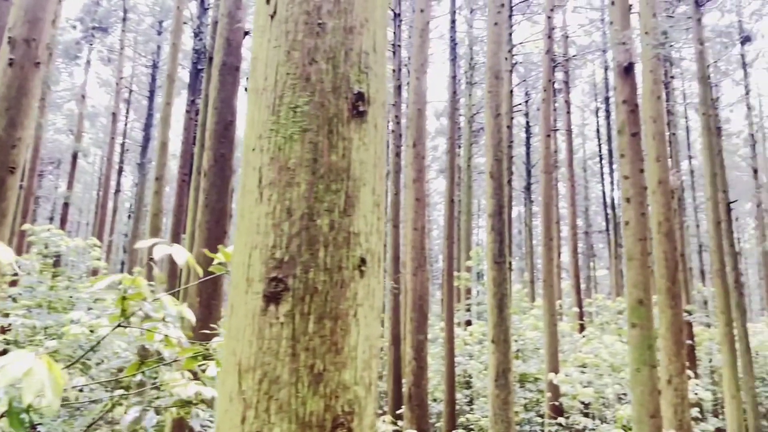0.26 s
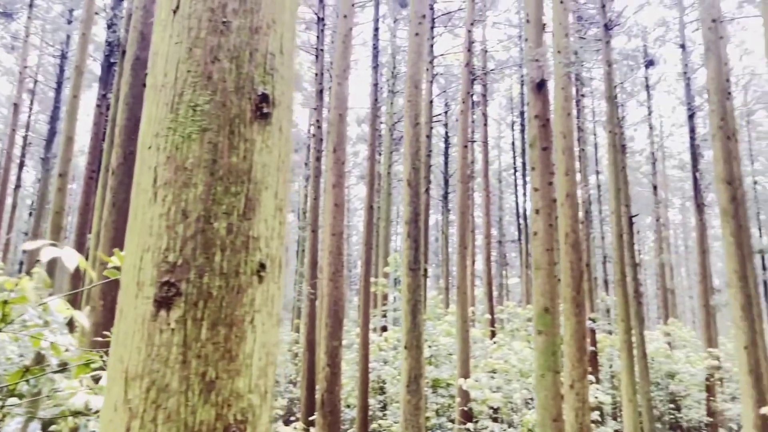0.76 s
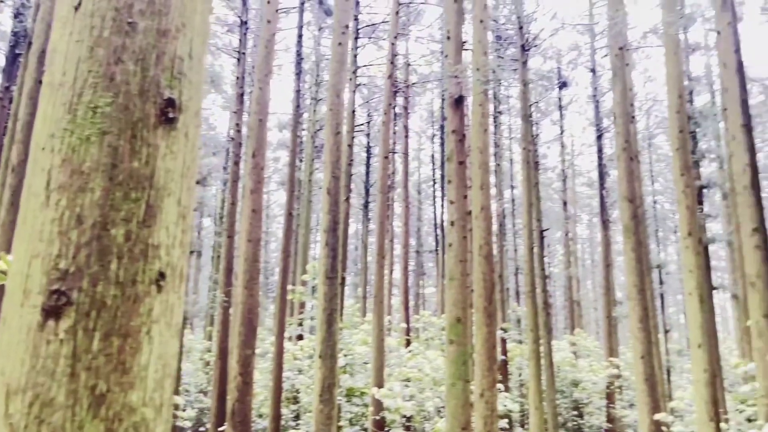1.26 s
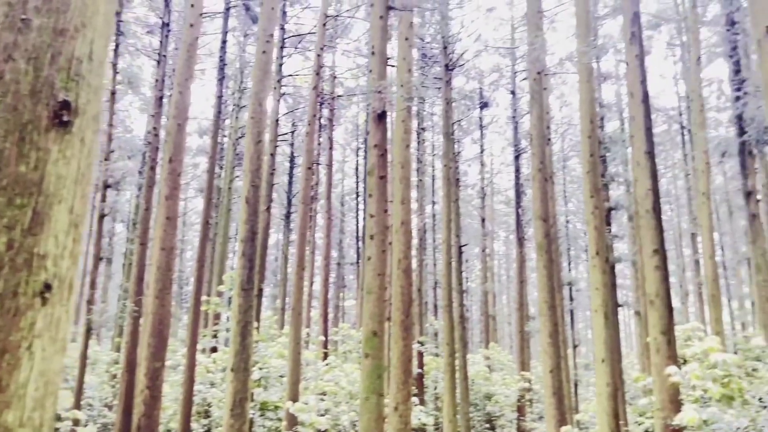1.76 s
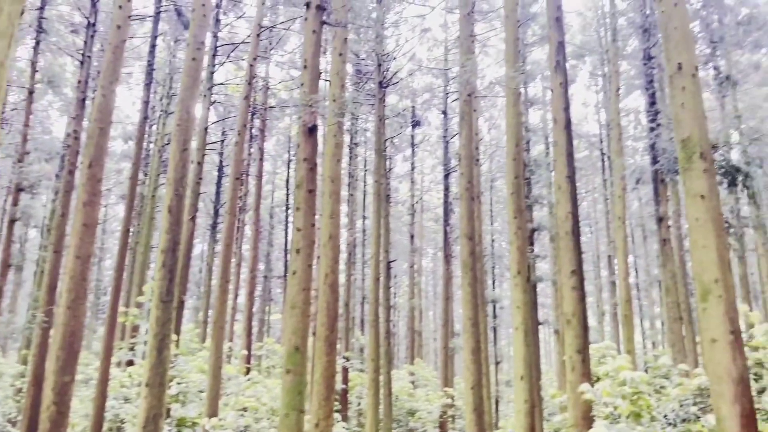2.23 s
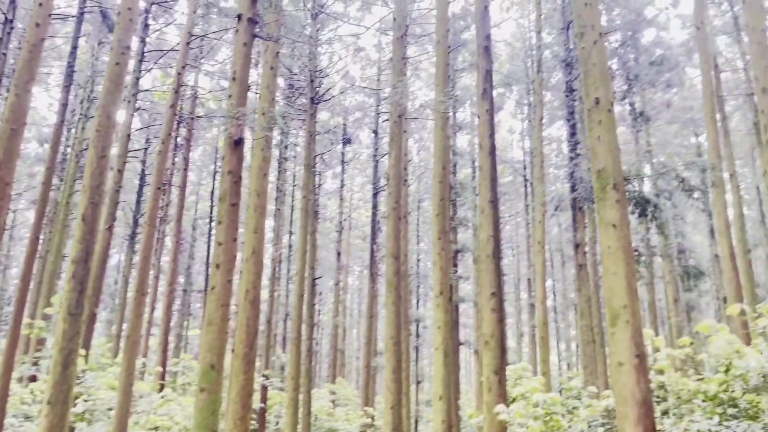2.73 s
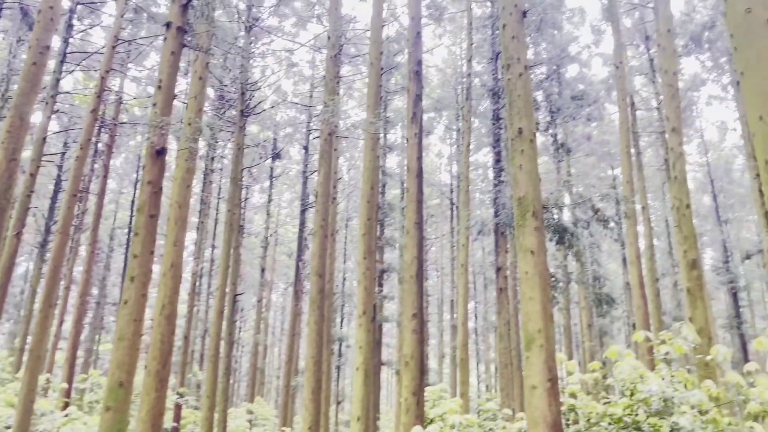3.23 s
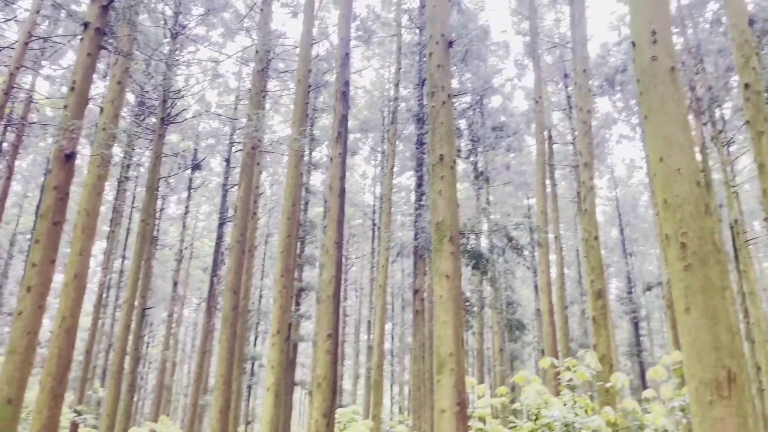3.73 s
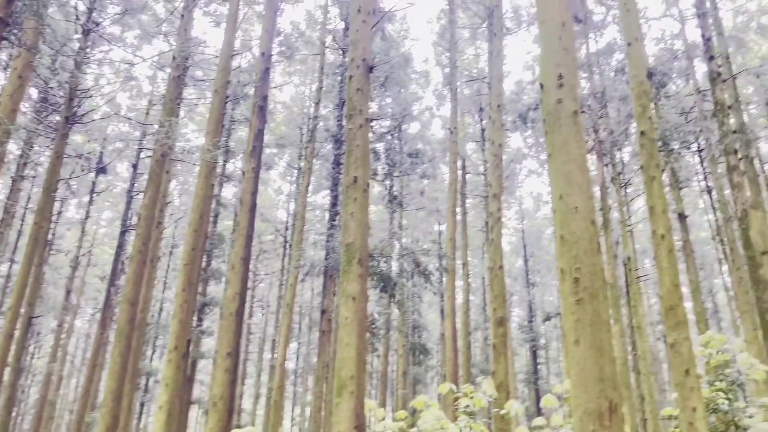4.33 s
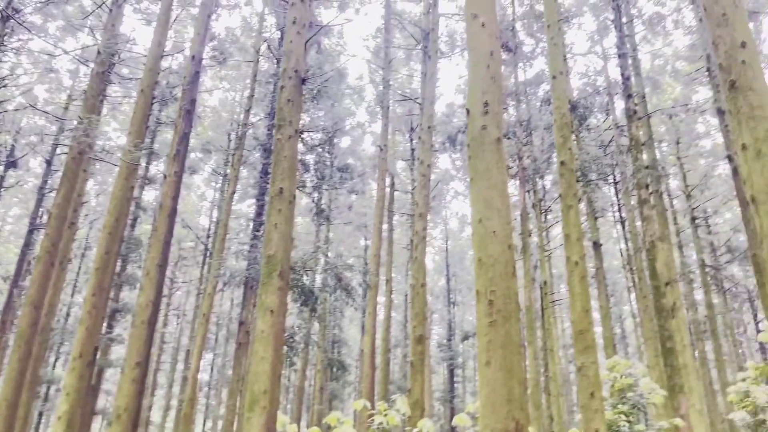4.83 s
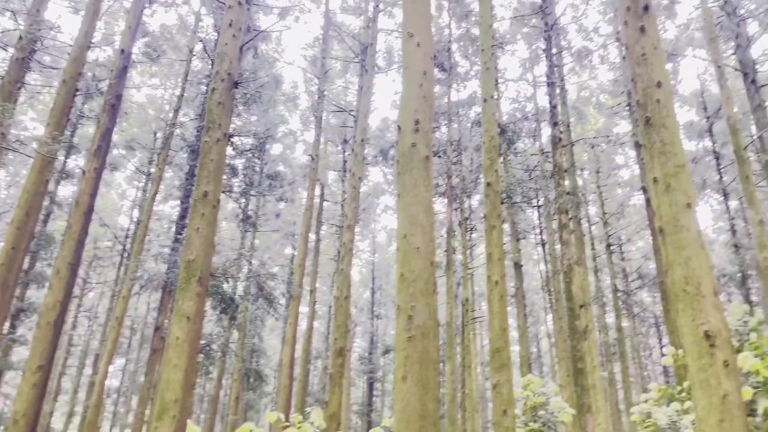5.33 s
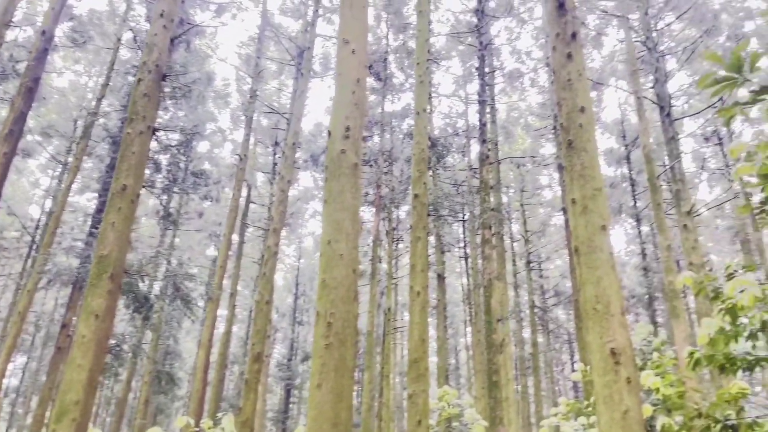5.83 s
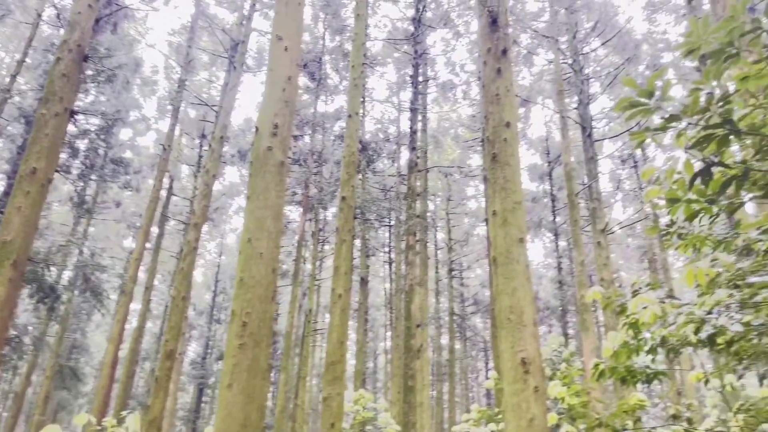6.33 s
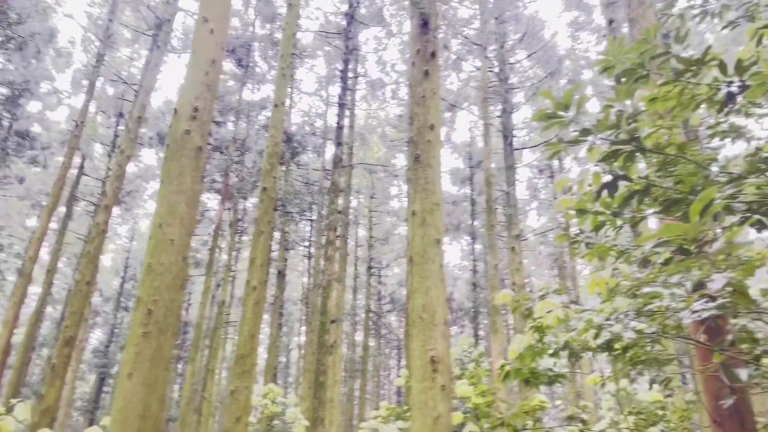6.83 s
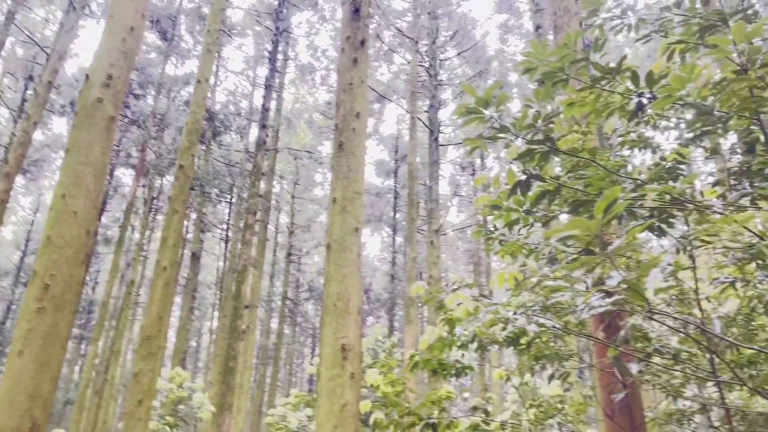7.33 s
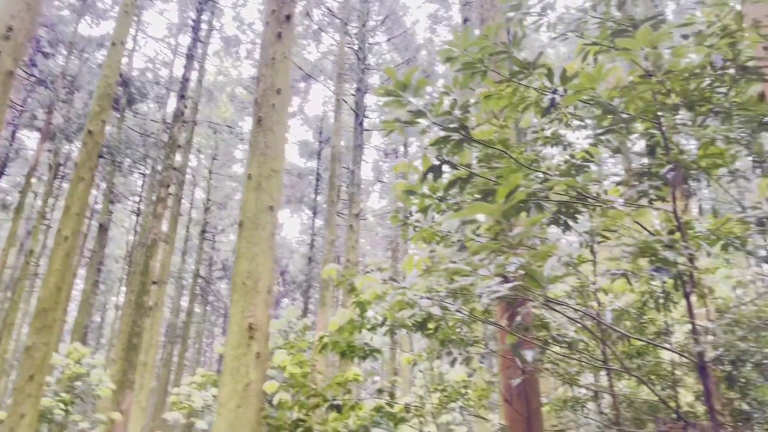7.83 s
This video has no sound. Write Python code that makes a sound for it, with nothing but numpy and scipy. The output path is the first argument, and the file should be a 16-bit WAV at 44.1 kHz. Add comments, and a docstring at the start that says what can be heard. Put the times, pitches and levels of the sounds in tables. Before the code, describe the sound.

Steady rain hisses through a forest while close drops tap on leaves and thump on a thin sheet.

```python
"""Steady rain in a conifer forest.

Distant rain hisses, a far bird peeps once. Small drops patter on leaves; near drops tap and splash.
The heaviest shake a thin sheet with a thump that falls in pitch. Heard by a one-microphone phone
beside the sheet; low background noise rises and dips as its wind filter opens and closes."""
import sys
import numpy as np
from scipy import signal
from scipy.fft import rfft, irfft
from scipy.io import wavfile
from scipy.ndimage import uniform_filter1d

SR = 44100
rng = np.random.default_rng(int(sys.argv[2]) if len(sys.argv) > 2 else 0)


def log_audio(samples):
    """Write samples as a 16-bit WAV file to the path given in sys.argv[1]."""
    # one column per channel
    frames = np.atleast_2d(samples).T
    # limit to full scale, then quantise
    limited = np.clip(frames, -1, 1)
    pcm = np.round(limited * 32767).astype(np.int16)
    wavfile.write(sys.argv[1], SR, pcm)


N = 356328

# Far rain spectrum: freq_hz, density_db
HISS_SPECTRUM = [(200, -44), (500, -18.5), (1000, -13.5), (1570, -4), (1940, -12), (2670, -8), (4180, -7.5),
                 (5400, -11.5), (6550, -17.5), (10800, -17.5), (12000, -20.5), (13700, -21), (15700, -21),
                 (16100, -40)]
# Deep rumble spectrum: freq_hz, density_db
RUMBLE_SPECTRUM = [(20, -38), (45, 1), (90, -1.5), (160, -5.5), (400, -25), (3000, -65)]
# Low noise floor spectrum: freq_hz, density_db
FLOOR_SPECTRUM = [(60, -26.5), (160, -1), (300, 0.5), (600, -0.5), (1000, 0), (2000, -19.5), (6000, -81)]
# Low noise let through by the phone's wind filter: time_s, rumble_db, floor_db
WIND_FILTER_LEVELS = [(0.0, -62.5, -52.5), (0.58, -61, -60), (1.22, -67.5, -51.5), (1.51, -68, -58),
                      (1.75, -60.5, -53.5), (2.54, -52, -52.5), (3.3, -61.5, -54), (3.55, -69, -59.5),
                      (3.8, -66, -60.5), (4.0, -60, -51.5), (4.79, -68, -56.5), (5.05, -68.5, -62.5),
                      (5.65, -68.5, -67.5), (5.95, -65, -54.5), (6.3, -69.5, -52), (6.6, -62.5, -65.5),
                      (7.43, -71, -61.5), (8.08, -68, -60.5)]
# Spray spectrum of a bursting drop: freq_hz, density_db
SPRAY_SPECTRUM = [(5000, -6), (7000, -1.5), (10800, -3), (12000, -1), (13700, -2.5), (15500, -10),
                  (16200, -32)]
# Near drops on leaves: snap_s, low_hz, high_hz, low_db, mid_db, high_db, spray_db, spread_ms
LEAF_DROPS = [(0.0958, 1260, 5600, -32.5, -39, -42, -48, 1.46),
              (0.358, 1570, 5340, -60, -34.5, -37.5, -39, 1.7),
              (0.6227, 1960, 4600, -50, -28, -29.5, -36, 2.3),
              (0.9881, 1320, 4660, -23, -36.5, -45, -39.5, 1.04),
              (1.0798, 1480, 5830, -27.5, -46, -29.5, -29, 1.23),
              (1.1593, 1170, 4050, -39, -47, -55, -47, 1.5), (1.2462, 1260, 4050, -39, -40, -43, -45, 1),
              (1.2575, 1660, 5030, -39, -47, -44, -54, 3), (1.2696, 1400, 5200, -45, -47, -44, -53, 2.8),
              (1.5068, 854, 6100, -25, -29, -35, -36, 2.5),
              (1.5856, 1660, 4420, -41, -31.5, -25.5, -29, 1.33),
              (1.6163, 1350, 4600, -34.5, -43, -45, -60, 2.8),
              (1.8344, 1510, 4120, -43.5, -54, -39.5, -45, 2.3),
              (2.0025, 1470, 6100, -40, -46, -57, -49.5, 1.9),
              (2.1416, 1830, 4000, -44, -38.5, -40, -60, 1.5),
              (2.4369, 690, 4540, -32.5, -34, -29.5, -40, 2.1),
              (2.4432, 1600, 5240, -32.5, -32.5, -28, -40, 2.4),
              (2.5372, 1420, 4030, -53, -60, -45.5, -54, 5.3),
              (2.5719, 710, 4170, -40.5, -49, -41.5, -50, 4.6),
              (2.6247, 1490, 4320, -36, -41, -40.5, -48, 0.92),
              (2.707, 1400, 4170, -59, -46, -41.5, -45, 1.3),
              (2.822, 1370, 4230, -32, -32.5, -33, -43, 1.15),
              (2.9022, 930, 3740, -34.5, -39, -53, -38.5, 1.3),
              (2.9565, 1500, 4260, -25.5, -32, -28, -28, 1.44), (3.0134, 1400, 4500, -35, -47, -47, -46, 1),
              (3.0995, 1570, 4640, -24, -39, -38.5, -46, 1.2),
              (3.1202, 1580, 4830, -32, -32, -31.5, -31.5, 3.4),
              (3.3581, 1310, 4400, -43.5, -46.5, -57, -60, 1.7),
              (3.467, 1050, 5000, -44.5, -44, -57, -60, 2.8),
              (3.7472, 1580, 4640, -51, -39.5, -53, -52, 0.91),
              (3.7595, 1580, 6050, -42, -47, -49, -63, 1.4),
              (3.847, 1700, 5470, -35, -24.5, -34, -38, 0.94),
              (3.887, 1390, 5210, -23.5, -42, -19, -34.5, 1.05),
              (4.0971, 1480, 3900, -34.5, -37, -45, -47, 1.2),
              (4.1627, 1610, 5880, -39, -55, -44, -53, 1.7),
              (4.1775, 1320, 4160, -41.5, -53, -44, -49, 0.84),
              (4.2349, 1460, 6170, -30.5, -42, -39, -52, 1.14),
              (4.3512, 1160, 3950, -45, -55, -41, -51, 1.7), (4.409, 1170, 5000, -41, -48, -53, -60, 0.79),
              (4.4467, 1540, 4500, -29, -33.5, -33.5, -47, 1.3),
              (4.7042, 970, 6160, -62, -62, -46, -62, 0.7), (5.101, 1140, 4500, -49, -51, -49, -46.5, 0.88),
              (5.155, 1590, 4970, -48, -40, -38, -53, 1.34),
              (5.6792, 820, 4200, -40.5, -38.5, -48, -39.5, 1.04),
              (5.6884, 910, 3970, -46, -55, -40.5, -43, 2.3),
              (5.784, 1160, 6300, -43.5, -44.5, -53, -56, 2.5),
              (5.8587, 700, 4060, -49, -45, -33, -41.5, 2.1),
              (5.873, 1500, 4470, -32.5, -29, -23, -53, 1.3), (5.881, 1130, 4280, -33, -38, -34, -45, 4.1),
              (5.9062, 1560, 5600, -33.5, -48, -35, -60, 0.95),
              (6.0429, 1800, 5270, -44, -44.5, -58, -68, 1), (6.1745, 1460, 4600, -50, -52, -43, -62, 1.6),
              (6.4733, 1610, 4300, -47, -43, -43, -60, 1.2), (6.7577, 1220, 6000, -33.5, -36, -47, -41, 3),
              (6.7783, 690, 4900, -48, -43, -50, -31, 0.7), (6.806, 1530, 4800, -54, -45, -41, -42, 1.4),
              (6.8144, 1790, 4500, -52, -48, -38, -51, 3.3),
              (6.8471, 1570, 5250, -34.5, -27.5, -35.5, -38, 1.9),
              (6.8775, 1200, 5700, -34.5, -40, -37.5, -60, 1.55),
              (6.9895, 1660, 4900, -41, -42, -54, -49, 2.5),
              (7.0576, 1510, 4700, -62, -56, -45.5, -54, 0.5),
              (7.15, 650, 4500, -36.5, -53, -56, -49, 1.03), (7.1722, 1640, 4670, -42, -37, -33, -37, 3.3),
              (7.1784, 1500, 5020, -36.5, -30.5, -28.5, -35, 7.1),
              (7.447, 1230, 4120, -60, -62, -42, -60, 2), (7.6395, 1580, 4600, -29.5, -33.5, -33, -52, 1.3)]
# Heavy drops on the sheet, before its lowpass: start_s, peak_db, start_hz, cycles_per_efold, decay_ms
SHEET_DROPS = [(0.356, -44.5, 1070, 3.29, 15), (0.6222, -20.5, 1380, 1.32, 9.9), (1.079, -41, 1660, 1.2, 5),
               (1.5071, -20, 1540, 1.3, 3.5), (1.5846, -20.5, 980, 1.54, 13.3),
               (1.8355, -33, 860, 1.46, 6.5), (2.4365, -14, 1060, 1.46, 13.4),
               (2.9032, -14.5, 935, 1.27, 5.6), (2.9572, -28, 473, 1.17, 19), (3.1175, -34, 347, 2.4, 46),
               (3.845, -27, 2200, 1, 2.0), (3.8873, -26.5, 1210, 0.77, 2.3), (4.6012, -43, 893, 3.44, 33.6),
               (5.677, -30, 2110, 2.06, 2.1), (5.86, -28.5, 2120, 1.5, 3.6), (6.7769, -4.5, 533, 1.05, 6.7),
               (7.15, -45, 1210, 1.24, 12), (7.6378, -42, 1650, 1.9, 1.5)]

LEAD_MS = 8  # lead-in before the snap


def undb(db):
    """Decibels to amplitude."""
    return 10 ** (np.asarray(db) / 20)


def unit(x):
    """Scale to unit RMS."""
    return x / np.sqrt(np.mean(x ** 2))


def colour(x, spectrum, size=2048):
    """Minimum-phase filter through (freq_hz, gain_db) points, by cepstral folding."""
    hz, db = np.transpose(spectrum)
    bins_hz = np.maximum(np.fft.rfftfreq(size, 1 / SR), 1)
    gain = undb(np.interp(np.log(bins_hz), np.log(hz), db))
    cepstrum = irfft(np.log(gain))
    cepstrum[1:size // 2] *= 2
    cepstrum[size // 2 + 1:] = 0
    impulse = irfft(np.exp(rfft(cepstrum)))
    return signal.fftconvolve(x, impulse)[:len(x)]


def ring(x, hz, *widths_hz):
    """Damped resonances at one pitch, in series, one per width."""
    for width_hz in widths_hz:
        x = signal.lfilter(*signal.iirpeak(min(hz, .4 * SR), hz / width_hz, fs=SR), x)
    return x


def walk(rate_hz):
    """Random steps, smoothed twice; unit RMS."""
    hold = int(SR / rate_hz)
    steps = np.repeat(rng.standard_normal(N // hold + 1), hold)
    return unit(uniform_filter1d(uniform_filter1d(steps, hold), hold)[:N])


def add(out, start_s, sound):
    """Mix sound into out."""
    i = int(start_s * SR)
    out[i:i + len(sound)] += sound[:max(len(out) - i, 0)]


def far_rain(level_db=-48):
    """Countless far drops blend into a fine-grained hiss."""
    drops = rng.standard_normal(N) * undb(2.53 * rng.exponential(size=N))
    flicker_db = .5 * walk(1.1) + 1.1 * walk(43)
    return undb(level_db + flicker_db) * unit(colour(drops, HISS_SPECTRUM))


def low_noise():
    """Low background noise rises and dips as the phone's wind filter opens and closes at set times."""
    time_s, *levels_db = np.transpose(WIND_FILTER_LEVELS)
    rumble_db, floor_db = (np.interp(np.arange(N) / SR, time_s, db) for db in levels_db)
    rumble = unit(colour(rng.standard_normal(N), RUMBLE_SPECTRUM)) * undb(rumble_db + 3.7 * walk(14))
    floor = unit(colour(rng.standard_normal(N), FLOOR_SPECTRUM)) * undb(floor_db + 1.6 * walk(15))
    return rumble + floor


def far_bird(end_s=6.995, length_s=.067, start_hz=7480, sag_hz_per_s=6000, swell_db_per_s=120):
    """One faint, thin peep that swells as its pitch sags."""
    out = np.zeros(N)
    t = np.arange(int(length_s * SR)) / SR
    envelope = undb(-52 + swell_db_per_s * (t - length_s)) * signal.windows.tukey(len(t), .2)
    cycles = (start_hz - sag_hz_per_s * t / 2) * t
    add(out, end_s - length_s, envelope * np.sin(2 * np.pi * cycles))
    return out


def leaf_tap(low_hz, mid_hz, high_hz, levels_db, spread_ms):
    """A drop snaps, spreads and drains; the tap rings at three pitches and spray hisses."""
    ms = np.arange(int(.04 * SR)) / SR * 1000 - LEAD_MS
    lead_in = 1.18 * np.exp(ms / (.35 + .45 * spread_ms))  # smear of noise rising into the snap
    spread = np.exp(-np.abs(ms) / (.79 * spread_ms))
    drain = undb(-18) * np.exp(-np.abs(ms) / 8)
    drive = rng.standard_normal((4, len(ms))) * np.where(ms < 0, lead_in, spread + drain)
    drive[:, int(LEAD_MS * SR / 1000)] = 9.7 / spread_ms ** 1.33  # snap: harder with less spread
    low_ring = unit(ring(drive[0], low_hz, 313, 1970))  # mostly the phone's own resonance
    leaf_body = unit(ring(ring(drive[0], 590, 330), 620, 930))
    low = low_ring - undb(-12.5) * leaf_body
    mid = ring(drive[1], mid_hz, 530, 2900)
    high = ring(drive[2], high_hz, 840, 4300, 6000)
    spray = colour(drive[3], SPRAY_SPECTRUM)
    # .5: levels refer to 10 ms, the tap lasts 40 ms
    return sum(.5 * unit(x) * undb(db) for x, db in zip((low, mid, high, spray), levels_db))


def patter(count=240):
    """Small drops, mostly faint, each on a different leaf."""
    out = np.zeros(N)
    for when, size, spread, low, mid, high, *band_draws in rng.random((count, 10)):
        size_db = -1.75 * np.log(1 - .9 * size)
        levels_db = np.array([-64, -63.5, -66, -64.5]) + size_db + 10.5 * np.array(band_draws)
        rings_hz = 900 + 900 * low, 2200 + 1600 * mid, 4000 + 2200 * high
        add(out, when * N / SR, leaf_tap(*rings_hz, levels_db, spread_ms=.58 + 3 * spread))
    return out


def near_drops(mid_ratio=.57):
    """Distinct drops strike nearby leaves."""
    out = np.zeros(N)
    for snap_s, low_hz, high_hz, *levels_db, spread_ms in LEAF_DROPS:
        tap = leaf_tap(low_hz, mid_ratio * high_hz, high_hz, levels_db, spread_ms)
        add(out, snap_s - LEAD_MS / 1000 - .0003, tap)
    return out


def sheet_thumps(rise_ratio=.28, lowpass_hz=800):
    """Fast waves on the thin sheet arrive first, so pitch falls as 1/t; a rough wobble lingers."""
    out = np.zeros(N)
    ms = np.arange(int(.25 * SR)) / SR * 1000
    for start_s, peak_db, start_hz, cycles_per_efold, decay_ms in SHEET_DROPS:
        cycles = cycles_per_efold * np.log1p(ms / 1000 * start_hz / cycles_per_efold)
        envelope = (1 - np.exp(-ms / (rise_ratio * decay_ms))) * np.exp(-ms / decay_ms)
        thump = -undb(peak_db) * np.sin(2 * np.pi * cycles) * envelope / envelope.max()
        wobble = unit(ring(rng.standard_normal(len(ms)), 100, 120, 240))
        swell = (1 - np.exp(-ms / 5.1)) ** 2 * np.exp(-ms / 27.3)
        wobble_db = -45.5 + .37 * peak_db + 13 * np.log10(decay_ms)
        add(out, start_s, thump + undb(wobble_db) * wobble * swell / swell.max())
    return signal.sosfilt(signal.butter(3, lowpass_hz, fs=SR, output="sos"), out)


def scene():
    """All sources, in two channels that differ by a trace."""
    mix = far_rain() + low_noise() + patter() + near_drops() + sheet_thumps() + far_bird()
    side = undb(-50) * ring(np.roll(mix, 40), 1700, 13000) * walk(300)
    return np.array([mix + side, mix - side])


def record(dry, notch_hz=12750, highpass_hz=45, lowpass_hz=16400):
    """The microphone port cancels one band; the phone trims the deep bass and cuts the top."""
    for q in (5, 8, 14):
        dry = signal.lfilter(*signal.iirnotch(notch_hz, q, fs=SR), dry)
    dry = signal.sosfilt(signal.butter(2, highpass_hz, "highpass", fs=SR, output="sos"), dry)
    return signal.sosfilt(signal.ellip(8, .2, 70, lowpass_hz, fs=SR, output="sos"), dry)


dry = scene()
out = record(dry)
log_audio(out)
```